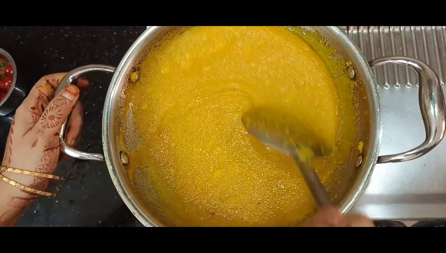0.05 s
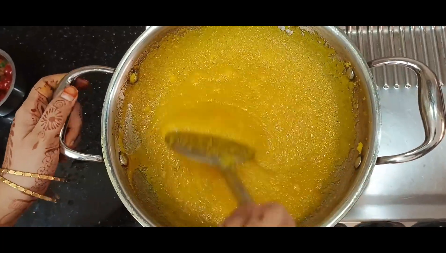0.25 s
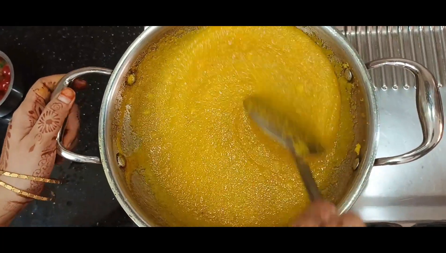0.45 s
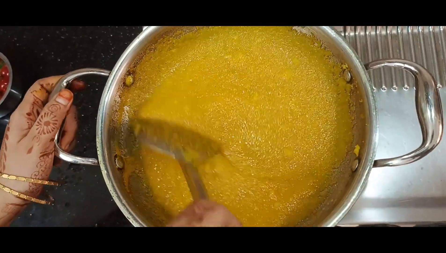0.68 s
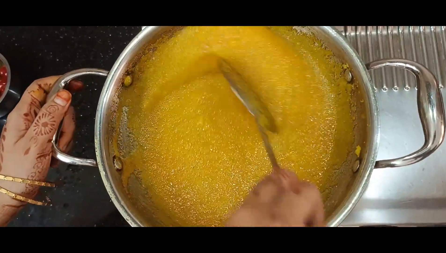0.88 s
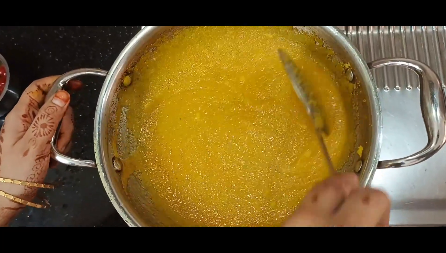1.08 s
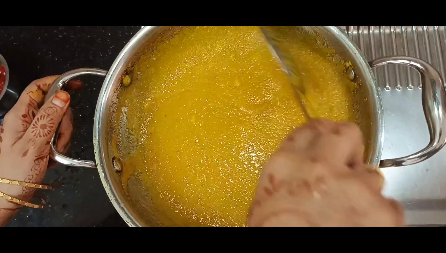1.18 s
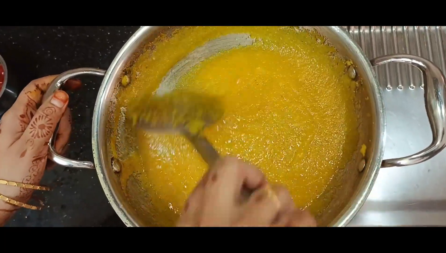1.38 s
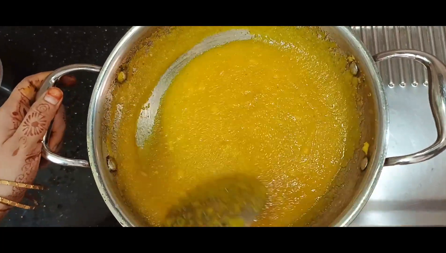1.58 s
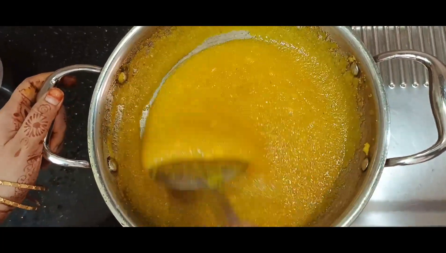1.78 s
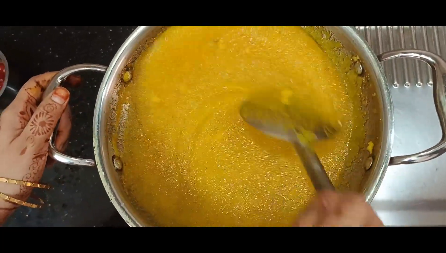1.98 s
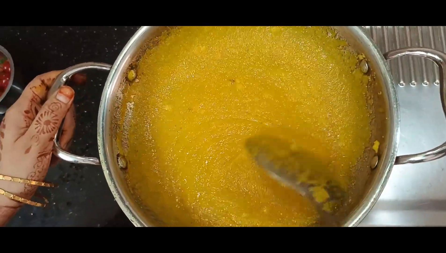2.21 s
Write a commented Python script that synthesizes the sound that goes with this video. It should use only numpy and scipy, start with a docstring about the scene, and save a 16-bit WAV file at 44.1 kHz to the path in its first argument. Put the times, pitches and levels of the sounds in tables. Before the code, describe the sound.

A steel spoon stirs thick porridge in a metal pot, close by in a small kitchen. After a soft opening stroke, damped knocks land at about 0.2, 0.7, 1.2 and 1.7 seconds, each leading into a short gritty scrape with a dull porridge slap. The scrapes at 0.2 and 1.8 seconds are strongest. Bangles tink faintly between strokes, and the room rings briefly over a faint low hum.

```python
"""Stirring semolina in a steel pot

A steel spoon stirs thick porridge, about two turns a second, near a phone in a small kitchen.
On each turn it knocks on the pot, which the porridge damps, then drags over the gritty bottom
in tiny slips. The porridge slaps dully and bangles tink faintly between the strokes.
The room rings briefly over a low hum."""
import sys
import numpy as np
from scipy import signal
from scipy.fft import rfft, irfft, next_fast_len
from scipy.io import wavfile
from scipy.ndimage import map_coordinates

SR = 44100
rng = np.random.default_rng(int(sys.argv[2]) if len(sys.argv) > 2 else 0)


def to_wav(sig):
    """Store sig (one row per channel, or 1-D mono) as 16-bit WAV at the path in sys.argv[1].

    Samples outside -1..1 are clipped; the rate is SR.
    """
    pcm = np.clip(np.atleast_2d(sig), -1, 1) * 32767
    pcm = np.round(pcm).astype(np.int16)
    wavfile.write(sys.argv[1], SR, pcm.T)  # frames by channels


N = 99225
FFT_SIZE = 2 * next_fast_len(N)
TIME = np.arange(N) / SR
FREQS = np.maximum(np.fft.rfftfreq(FFT_SIZE, 1 / SR), 1)


def gain(db):
    """Turn decibels into a multiplier."""
    return 10 ** (np.asarray(db) / 20)


def unit(x):
    """Scale a sound to an average (rms) size of 1."""
    return x / np.sqrt(np.mean(x ** 2))


def curve(points):
    """Join (Hz, value) points along a pitch scale."""
    hz, value = np.array(points, float).T
    return np.interp(np.log(FREQS), np.log(hz), value)


def tone_filter(db):
    """A filter's response to a click, with these levels and the sharpest possible start."""
    cepstrum = irfft(np.log(gain(db)))
    middle = len(cepstrum) // 2
    cepstrum[1:middle] *= 2
    cepstrum[middle + 1:] = 0
    return irfft(np.exp(rfft(cepstrum)))[:N]


def through(x, response):
    """Pass a sound through a filter, pot or room."""
    return signal.fftconvolve(x, response)[:N]


def noise(colour):
    """Noise shaped by (Hz, dB) points."""
    return unit(through(rng.standard_normal(N), tone_filter(curve(colour))))


def fade(ring_s):
    """Die away by 60 dB over the ring time."""
    return np.exp(-np.log(1000) * TIME / ring_s)


def at(start, x):
    """Delay a sound to its start time."""
    return np.concatenate([np.zeros(max(int(start * SR), 0)), x])[:N]


def resonance(hz, width_hz):
    """A randomly shaken, blurry note whose pitch may move."""
    smooth = signal.butter(2, width_hz / 2, fs=SR, output="sos")
    sway = signal.sosfilt(smooth, rng.standard_normal(N) + 1j * rng.standard_normal(N))
    cycles = np.cumsum(hz * np.ones(N)) / SR
    return unit(np.real(sway * np.exp(2j * np.pi * cycles)))


def swells(rows, width_hz, edge_s):
    """Gliding, blurry notes that fade in and out."""
    out = np.zeros(N)
    for start, end, db, start_hz, end_hz in rows:
        shape = np.clip(np.minimum(TIME - start, end - TIME) / edge_s, 0, 1)
        pitch = np.interp(TIME, [start, end], [start_hz, end_hz])
        out += gain(db) * shape * resonance(pitch, width_hz)
    return out


def moving_contact(x, depth_db=5, spacing_hz=110.04, changes_per_s=30):
    """As the spoon travels, different notes of the steel swell and sink at random."""
    hz, seconds, spectrum = signal.stft(x, SR, nperseg=1024, noverlap=768)
    place = np.meshgrid(hz / spacing_hz, seconds * changes_per_s, indexing="ij")
    favour = map_coordinates(rng.standard_normal((512, 256)), place, order=2, mode="mirror")
    _, shifted = signal.istft(spectrum * gain(depth_db * favour), SR, nperseg=1024, noverlap=768)
    return unit(shifted[:N])


def slips(colour, per_s=8000, spread_db=2.5):
    """Steel rides over the grains in many tiny, uneven slips."""
    happens = rng.random(N) < per_s / SR
    direction = rng.choice([-1, 1], N)
    size = gain(spread_db * np.minimum(rng.exponential(size=N), 5))
    return moving_contact(through(happens * direction * size, tone_filter(curve(colour))))


# One list per drag of the spoon. Each row: time in seconds, grinding level in dB, hiss level in dB.
DRAGS = [
    [(0, -49.5, -76), (.015, -74, -56), (.026, -62, -76), (.05, -58, -66), (.075, -68, -76),
     (.1, -96, -101)],
    [(.222, -33, -43.5), (.265, -44, -61), (.305, -41, -59), (.34, -40, -54), (.378, -40, -48.5),
     (.4, -46.5, -60.5), (.422, -43, -50), (.445, -50, -60), (.52, -64.5, -72), (.56, -71, -94)],
    [(.654, -48, -65), (.69, -44, -61), (.725, -48, -49.5), (.772, -50, -52), (.81, -60, -52),
     (.838, -52.5, -50), (.868, -67, -69), (.895, -70, -75), (.915, -56.5, -68.5), (.945, -63, -76),
     (.97, -93, -81)],
    [(1.172, -62, -54.5), (1.235, -59.5, -60.5), (1.262, -55.5, -57.5), (1.295, -54, -51),
     (1.346, -57.5, -47.5), (1.396, -50, -52.5), (1.438, -54, -59), (1.452, -61.5, -73.5),
     (1.52, -88, -84.5)],
    [(1.74, -73, -61), (1.765, -44.5, -45), (1.795, -44.5, -43), (1.834, -33.5, -47), (1.885, -39, -46),
     (1.925, -40, -49.5), (1.955, -40, -48.5), (1.984, -42.5, -60), (2.0, -52.5, -59.5), (2.035, -62, -73),
     (2.074, -57.5, -61.5), (2.09, -98.5, -74.5)],
]
# The tone of the grinding and of the hiss. Each row: frequency in Hz, relative level in dB.
GRIND_COLOUR = [(60, -52.5), (220, -43.5), (480, -20), (720, -3), (1100, 1), (2000, -1.5), (3000, -2.5),
                (4500, -4), (7000, -15), (16000, -46)]
HISS_COLOUR = [(200, -42.5), (1500, -6), (3000, -37), (4600, 2), (6400, 3), (8000, 1.5), (11000, -10),
               (16000, -19)]

def drags(chatter_per_s=131.8, chatter_db=1.55):
    """Grinding and hiss follow the push of the hand and chatter together."""
    grind, hiss = np.zeros(N), np.zeros(N)
    for drag in DRAGS:
        seconds, grind_db, hiss_db = np.array(drag).T
        touching = (TIME >= seconds[0]) & (TIME <= seconds[-1])
        grind += touching * gain(np.interp(TIME, seconds, grind_db))
        hiss += touching * gain(np.interp(TIME, seconds, hiss_db))
    scrape = grind * slips(GRIND_COLOUR) + hiss * slips(HISS_COLOUR)
    chatter = np.interp(TIME * chatter_per_s, np.arange(N), rng.standard_normal(N))
    return scrape * gain(chatter_db * chatter)


# Porridge slaps. Each row: start and end in seconds, level in dB, first and last pitch in Hz.
SLAPS = [(0, .075, -60, 290, 294), (.22, .29, -57, 320, 406), (.66, .79, -64.5, 329, 310.5),
         (1.17, 1.27, -63.5, 350, 241), (1.735, 1.81, -58, 230, 301)]

def slaps():
    """Thick porridge slaps dully against the spoon."""
    return swells(SLAPS, width_hz=117, edge_s=0.043)


# The tone of the room noise. Each row: frequency in Hz, relative level in dB.
AIR_COLOUR = [(20, -25), (45, -25), (75, -21.5), (112, -5.5), (150, -8), (200, -12), (400, -14.5),
              (900, -15), (2000, -19), (5000, -28), (10000, -39), (16000, -39.5)]
# How loud the hum is. Each row: time in seconds, level in dB.
HUM_LEVEL = [(0, -89), (.45, -78.5), (.8, -72.5), (1.0, -73), (1.171, -81.5), (1.37, -70), (1.58, -85),
             (1.84, -72.5), (2.25, -75.5)]

def background(air_db=-74):
    """Quiet room noise and a wavering low hum."""
    air = gain(air_db) * noise(AIR_COLOUR)
    hum_db = np.interp(TIME, *np.array(HUM_LEVEL).T)
    return air + gain(hum_db) * resonance(hz=121, width_hz=46)


# The spoon hits the pot. Each row: start in seconds, relative level in dB, thud boost in dB,
# treble boost in dB, main pitch in Hz, boost at that pitch in dB.
KNOCKS = [(.005, -20.5, 4, -13, 790, 9), (0.0348, -25, 20, -18, 1570, 5), (0.2189, -1, -2.5, -4.5, 1600, 3),
          (0.6546, -17.5, 3.5, -17, 1200, 12.5), (0.7297, -2, 2.5, 6.5, 2320, -2),
          (1.1695, -0.5, -9.5, -12.5, 1020, 11), (1.7170, -21, -15.5, -17.5, 3260, 11),
          (1.7378, -8.5, -3, 11, 720, 9)]
# The tone all knocks share. Each row: frequency in Hz, relative level in dB.
KNOCK_COLOUR = [(40, -37.5), (180, -28.5), (300, -13.5), (600, -3), (1200, -4), (2000, -2), (3000, -2),
                (6000, -6.5), (10000, -14.5), (16000, -28.5)]

def knocks(level_db=4.5, clatter_db=-0.5, thud_hz=450, treble_hz=5500, peak_octaves=0.71):
    """A hit spreads through the steel, then spoon and wall clatter; each spot has its own tone."""
    travel_s, travel_hz = 0.00119, 1011  # the bending wave's delay at this pitch; treble comes sooner
    contact = irfft(np.exp(-4j * np.pi * travel_s * np.sqrt(travel_hz * FREQS)))[:N]
    out = np.zeros(N)
    for start, db, thud_db, treble_db, hz, peak_db in KNOCKS:
        clatter = unit(rng.standard_normal(N) * fade(ring_s=0.071)) / np.sqrt(N)
        thud = thud_db / (1 + (FREQS / thud_hz) ** 2)
        treble = treble_db / (1 + (treble_hz / FREQS) ** 2)
        peak = peak_db * np.exp(-(np.log2(FREQS / hz) / peak_octaves) ** 2)
        tone = tone_filter(curve(KNOCK_COLOUR) + thud + treble + peak)
        knock = through(contact + gain(clatter_db) * clatter, tone)
        out += gain(level_db + db) * at(start, knock)
    return out


# The filled pot's notes. Each row: pitch in Hz, relative level in dB, ring time in seconds.
POT_NOTES = [(515, -3, 0.068), (703, -3, 0.091), (788, -5, 0.061), (1046, -3, .2), (1093, -10.5, 0.17),
             (1390, -6, 0.11), (1563, -3, 0.11), (1865, -3.5, .13), (2042, -2, .12), (2110, -5.5, 0.058),
             (2310, -6, .16), (2356, -6, 0.13), (2485, -5, 0.22), (2911, -6, .12), (3015, -4.5, 0.13),
             (3471, -11.5, .12)]

def pot_ring(spoon, level_db=0.5):
    """The spoon sets the pot ringing, and the porridge soon damps it."""
    ring = np.zeros(N)
    for hz, db, ring_s in POT_NOTES:
        balance = 2 * np.log(1000) / (ring_s * SR)  # stops long notes from building up louder
        ring += gain(db) * balance * fade(ring_s) * np.cos(2 * np.pi * hz * TIME)
    return through(spoon, gain(level_db) * ring)


# How long the kitchen rings. Each row: frequency in Hz, ring time in seconds.
ROOM_RING = [(250, 0.82), (700, 0.52), (2000, 0.48), (5000, 0.43), (12000, 0.27)]

def kitchen_echo(sound, level_db=-14.5, build_s=0.0094):
    """Echoes from the walls blur together; the treble dies first."""
    spectrum, tail = rfft(rng.standard_normal(FFT_SIZE)), np.zeros(N)
    for hz, ring_s in ROOM_RING:
        band = curve([(other, other == hz) for other, _ in ROOM_RING])
        tail += irfft(spectrum * band)[:N] * fade(ring_s)
    tail *= 1 - np.exp(-TIME / build_s)
    return through(sound, gain(level_db) * unit(tail) / np.sqrt(N))


# The bangles touch. Each row: start in seconds, level in dB.
TINKS = [(0.169, -50), (0.607, -59.5), (1.058, -50), (1.541, -78.5)]
# Their notes. Each row: pitch in Hz, relative level in dB, ring time in seconds.
BANGLE_NOTES = [(5900, -24.5, .2), (6750, -18.5, 0.19), (8100, -26.5, .08), (8700, -19, .12),
                (10300, -28, .08), (10860, -5, .09), (11970, -7.5, .09), (14620, -15, .05),
                (15185, -7, 0.054)]

def bangles(contact_s=.002, tick_db=-2.5):
    """Thin metal rings touch with a small tick and ring high."""
    out, rise = np.zeros(N), np.minimum(TIME / contact_s, 1)
    for start, db in TINKS:
        ring = sum(gain(note_db) * fade(ring_s) * np.sin(2 * np.pi * (hz * TIME + rng.random()))
                   for hz, note_db, ring_s in BANGLE_NOTES)
        tick = noise([(1000, -4.5), (7000, -12.5), (9000, -5), (16000, -0.5)]) * fade(ring_s=.04)
        out += gain(db) * at(start, (ring + gain(tick_db) * tick) * rise)
    return out


# Hollow notes. Each row: start and end in seconds, level in dB, first and last pitch in Hz.
HOLLOWS = [(.23, .39, -59.5, 600, 641.5), (.385, .49, -53.5, 800.4, 665.6), (.74, .87, -57, 590.7, 686),
           (.88, .965, -63, 685, 734), (1.3, 1.465, -52.5, 1020, 783), (1.81, 2.01, -59, 900, 905)]

def hollow_ring():
    """The scrape rings hollow around the spoon."""
    return swells(HOLLOWS, width_hz=274, edge_s=0.023)


# One lingering note: start in seconds, pitch in Hz, level in dB, ring time in seconds.
AFTER_RING = (1.40, 2219, -63, .75)

def after_ring(rise_s=.02):
    """A free part of the steel rings on faintly after a drag."""
    start, hz, db, ring_s = AFTER_RING
    shape = np.minimum(TIME / rise_s, 1) * fade(ring_s)
    return at(start, gain(db) * shape * np.sin(2 * np.pi * hz * TIME))


# One bubble: start in seconds, level in dB, ring time in seconds.
POP = (1.594, -65, 0.0097)

def bubble_pop():
    """A tiny bubble bursts in the porridge with a bright snap."""
    start, db, ring_s = POP
    snap = noise([(2000, -21), (6000, -9), (8000, 0), (12000, -5), (16000, -6)])
    return at(start, gain(db) * snap * fade(ring_s))


def scene():
    """Spoon, pot, porridge and bangles in the kitchen, the same on the left and right."""
    spoon = knocks() + drags() + hollow_ring()
    near = spoon + pot_ring(spoon) + slaps() + after_ring() + bubble_pop() + bangles()
    heard = near + kitchen_echo(near) + background()
    return np.array([heard, heard])


# The microphone's tone. Each row: frequency in Hz, boost in dB.
MIC_COLOUR = [(20, -2), (6500, -0.5), (7300, -9.5), (8200, -15), (9000, -6), (9700, 3.5), (10700, 1),
              (12000, -4.5), (13900, 0), (15200, 9), (15700, -10), (17000, -18.5)]
# How its two openings differ. Each row: frequency in Hz, left minus right in dB.
LEFT_MINUS_RIGHT = [(5800, 0), (7050, -2.5), (7700, -9), (8150, -6.5), (8600, 2), (9200, 10), (9650, 7.5),
                    (10200, 2.5), (10700, 0.9), (11800, 0)]

def record(dry, top_hz=16400):
    """The phone dips part of the treble, a little differently on each side, and cuts the very top."""
    mic, channels = tone_filter(curve(MIC_COLOUR)), []
    for sound, side in zip(dry, (1, -1)):
        spectrum = rfft(through(sound, mic), FFT_SIZE)
        opening = gain(side * curve(LEFT_MINUS_RIGHT) / 2)
        channels.append(irfft(spectrum * opening)[:N])
    top_cut = signal.ellip(8, .2, 70, top_hz, fs=SR, output="sos")
    return signal.sosfilt(top_cut, channels)


dry = scene()
out = record(dry)
to_wav(out)
```